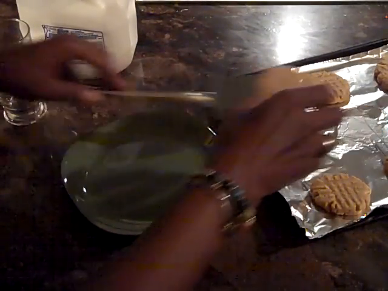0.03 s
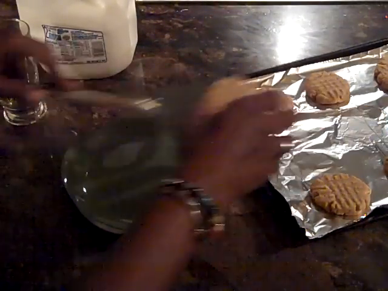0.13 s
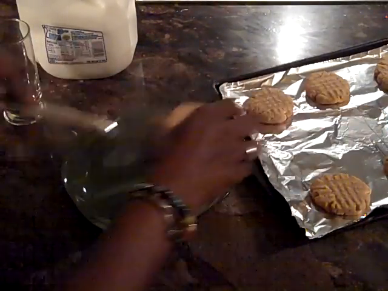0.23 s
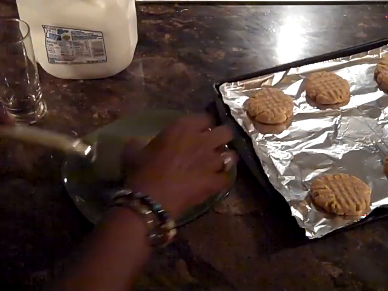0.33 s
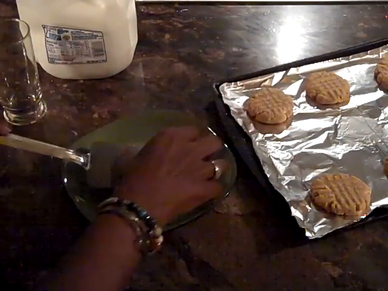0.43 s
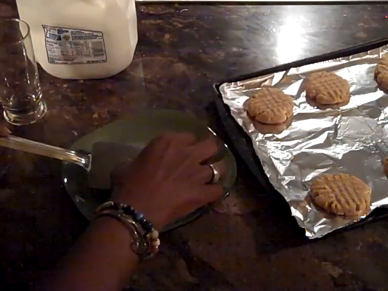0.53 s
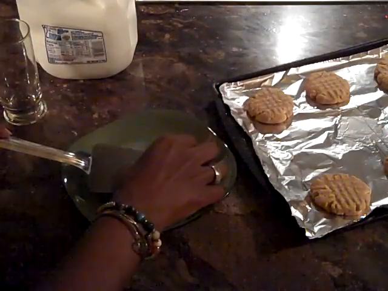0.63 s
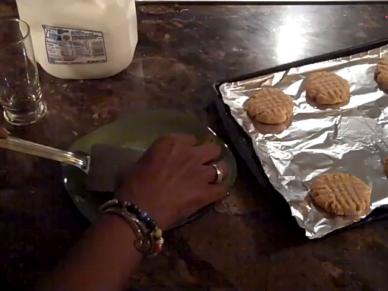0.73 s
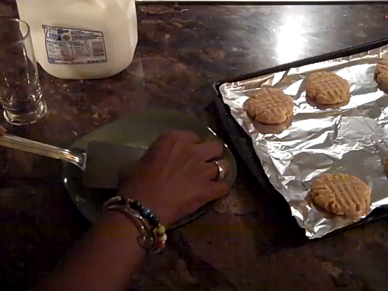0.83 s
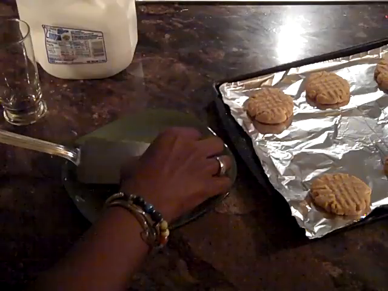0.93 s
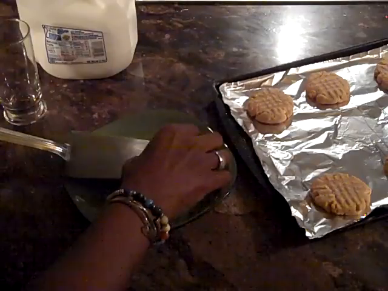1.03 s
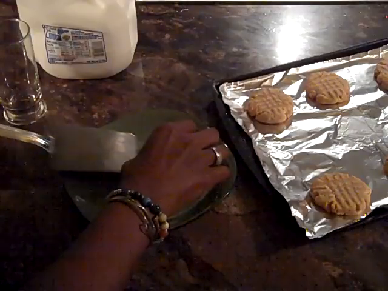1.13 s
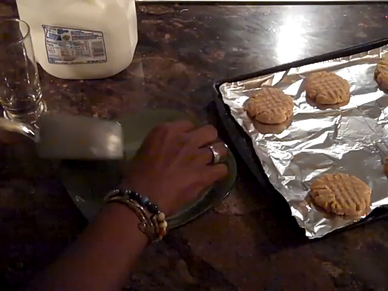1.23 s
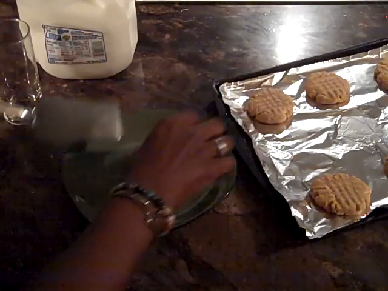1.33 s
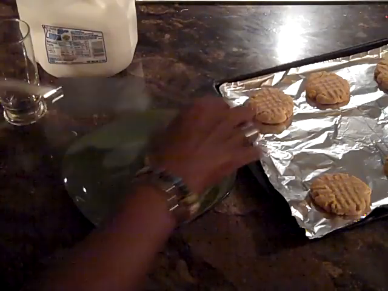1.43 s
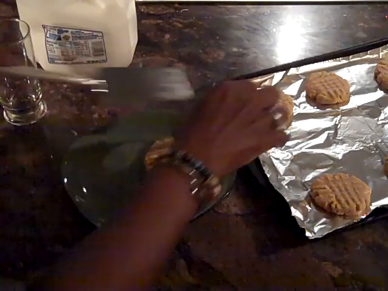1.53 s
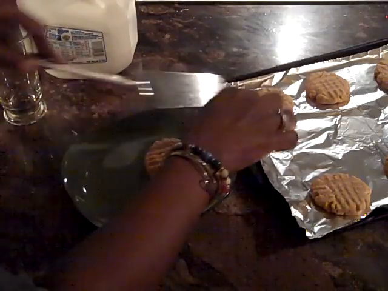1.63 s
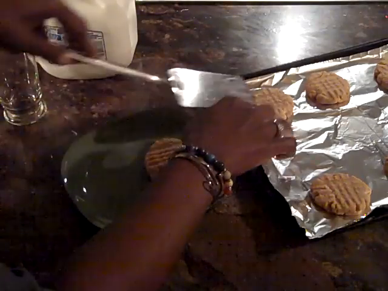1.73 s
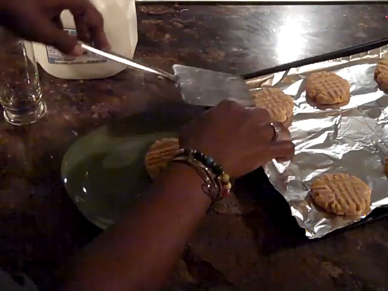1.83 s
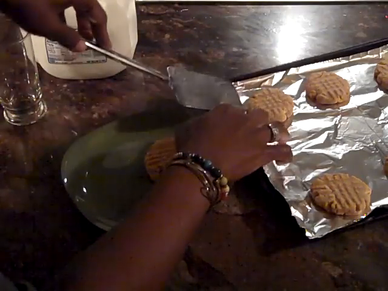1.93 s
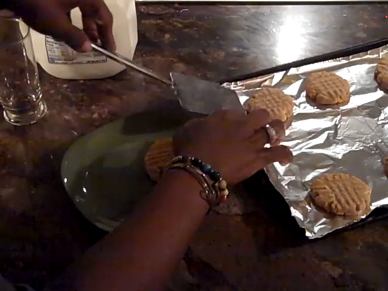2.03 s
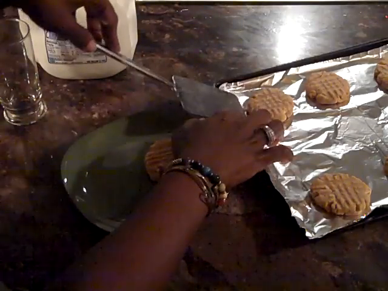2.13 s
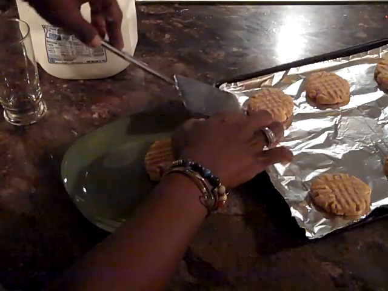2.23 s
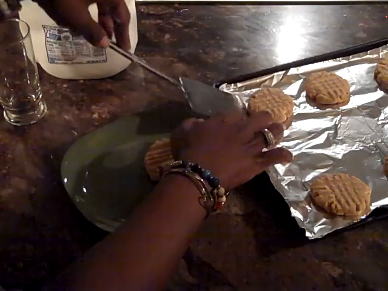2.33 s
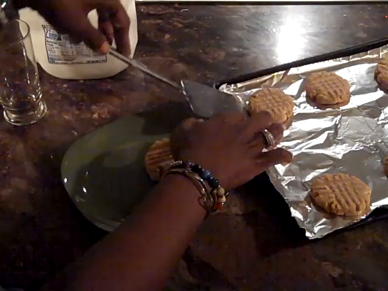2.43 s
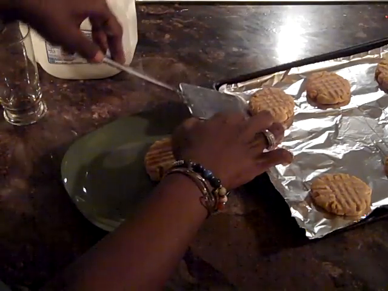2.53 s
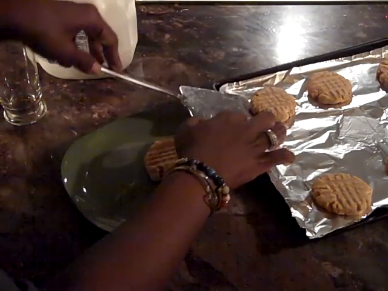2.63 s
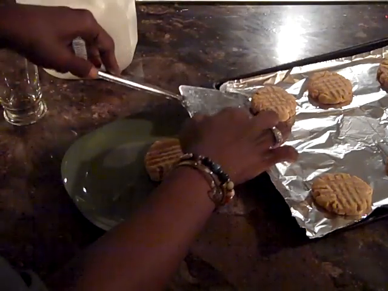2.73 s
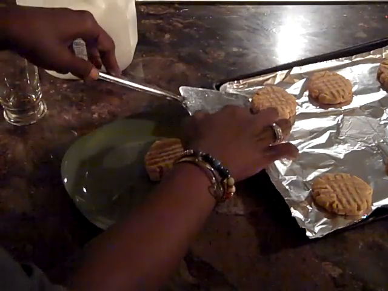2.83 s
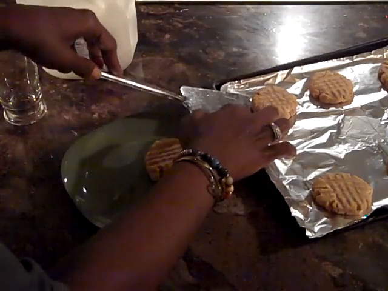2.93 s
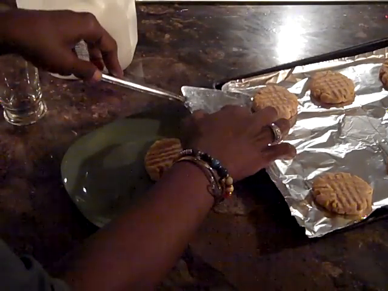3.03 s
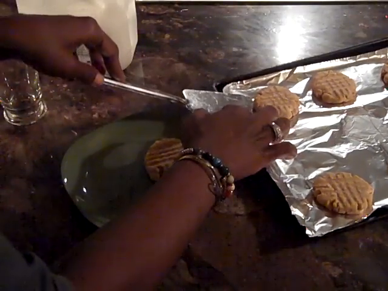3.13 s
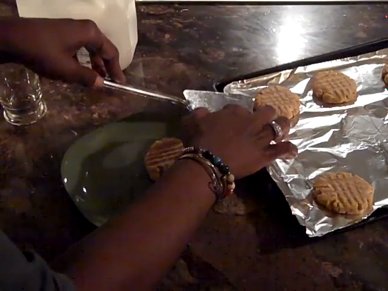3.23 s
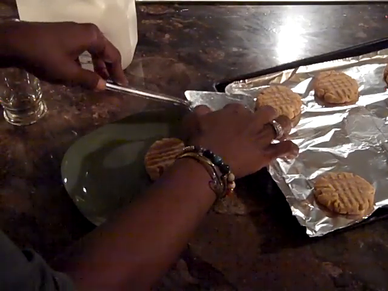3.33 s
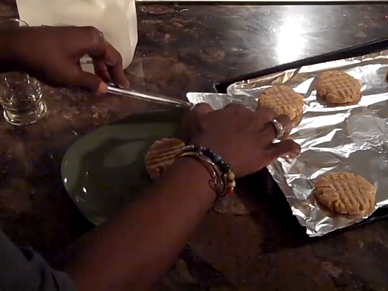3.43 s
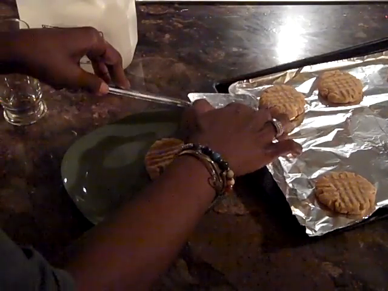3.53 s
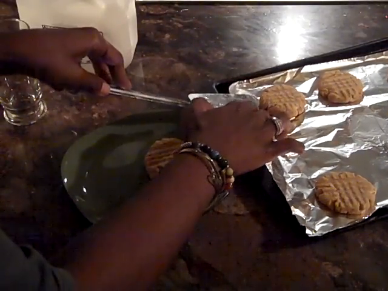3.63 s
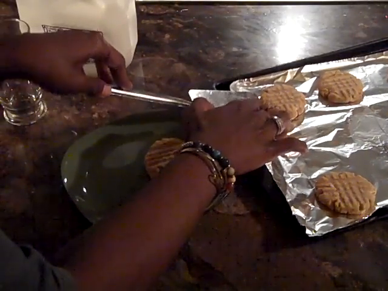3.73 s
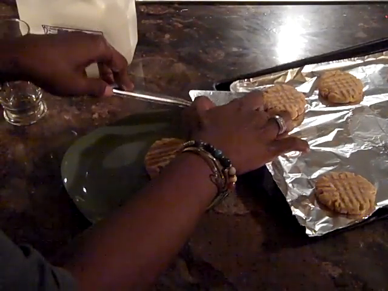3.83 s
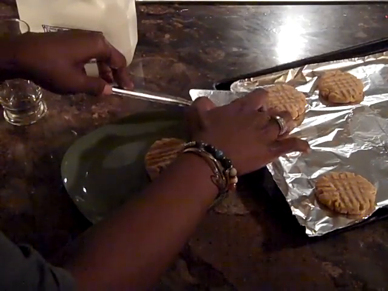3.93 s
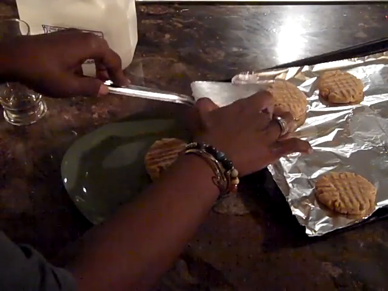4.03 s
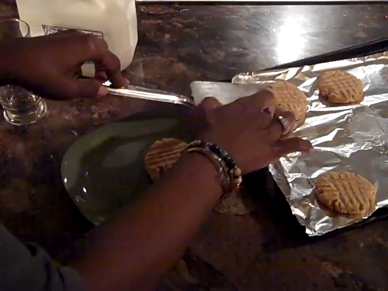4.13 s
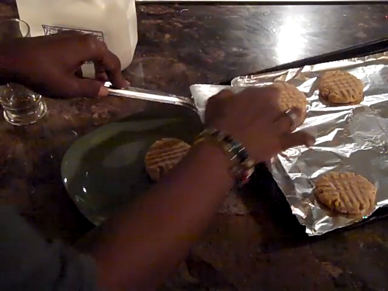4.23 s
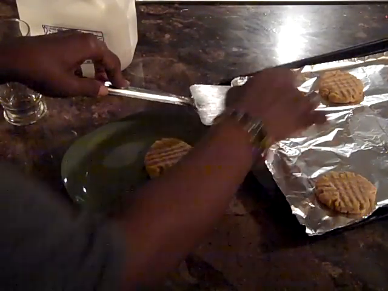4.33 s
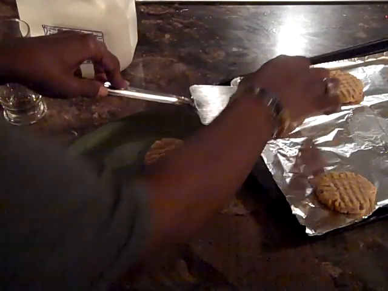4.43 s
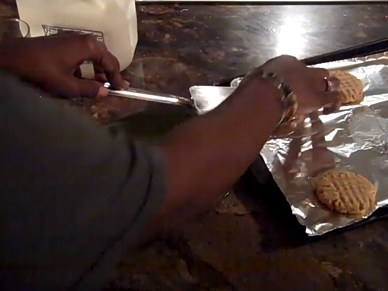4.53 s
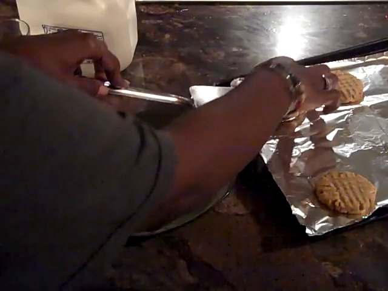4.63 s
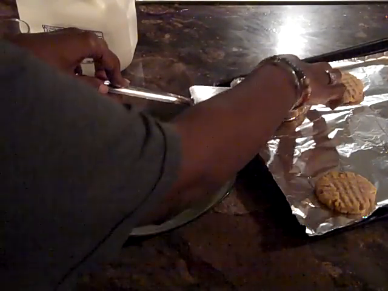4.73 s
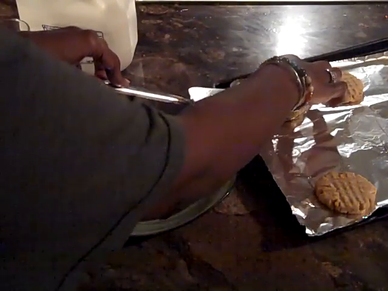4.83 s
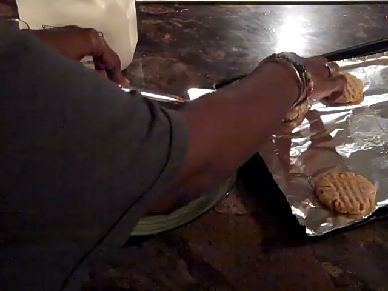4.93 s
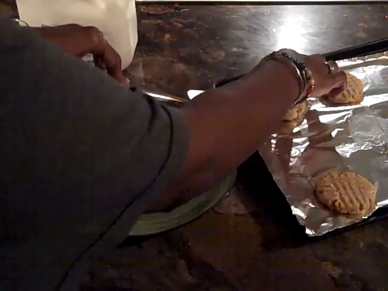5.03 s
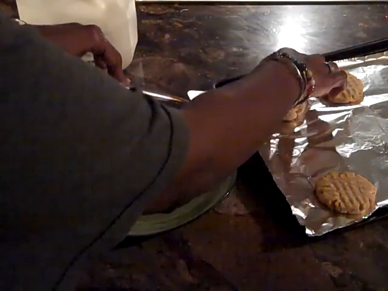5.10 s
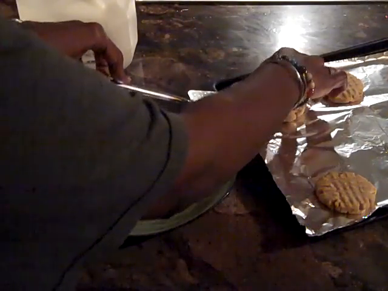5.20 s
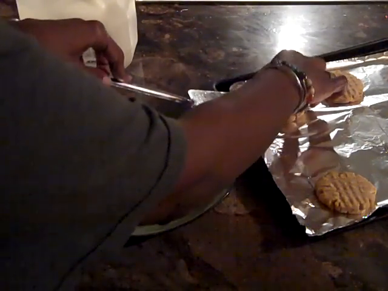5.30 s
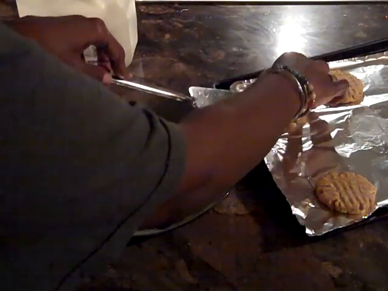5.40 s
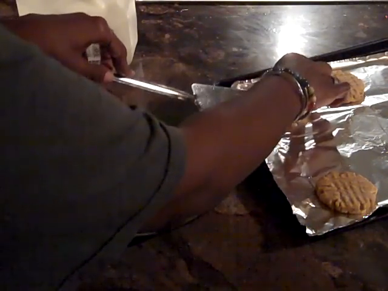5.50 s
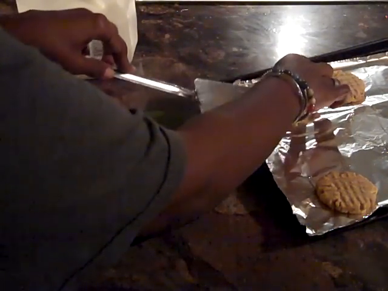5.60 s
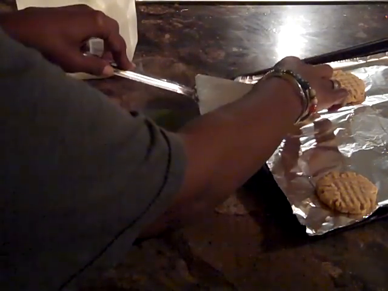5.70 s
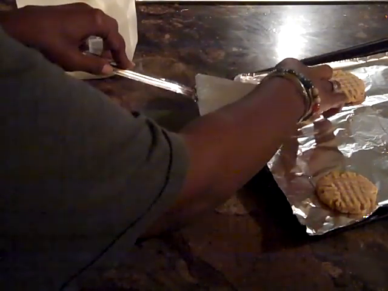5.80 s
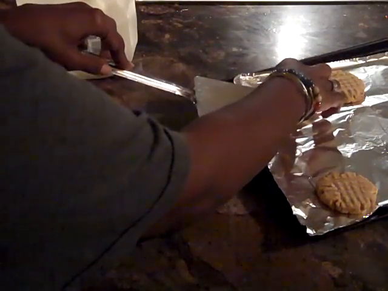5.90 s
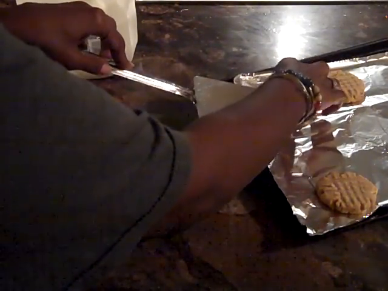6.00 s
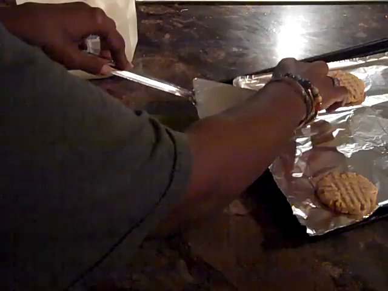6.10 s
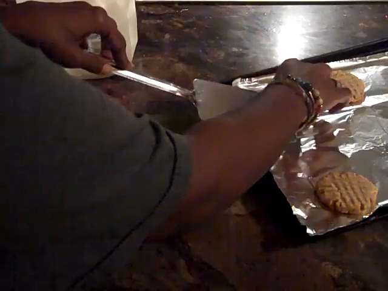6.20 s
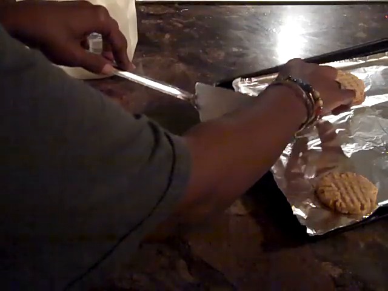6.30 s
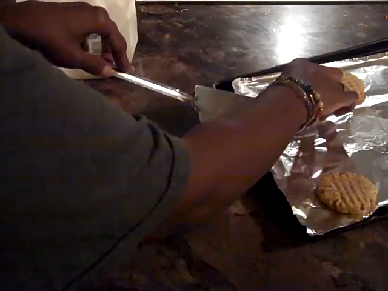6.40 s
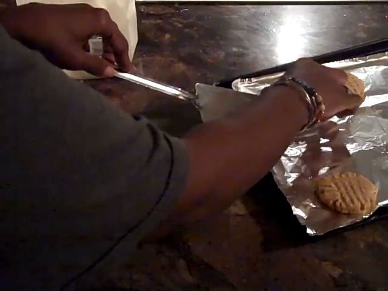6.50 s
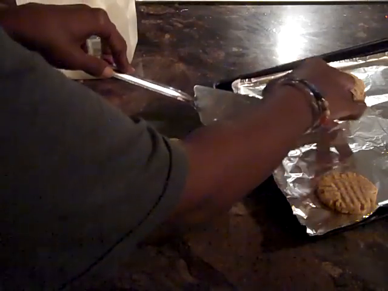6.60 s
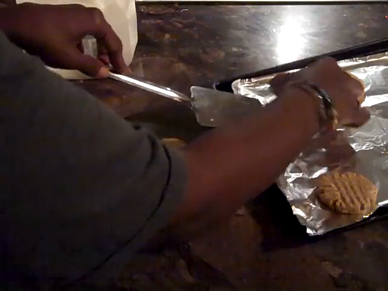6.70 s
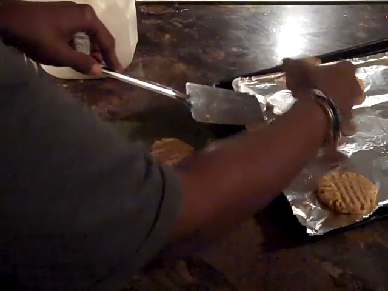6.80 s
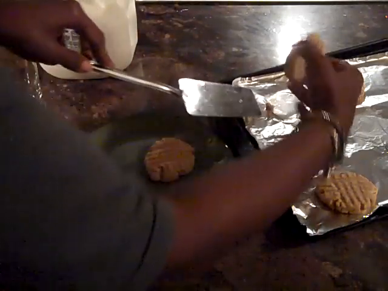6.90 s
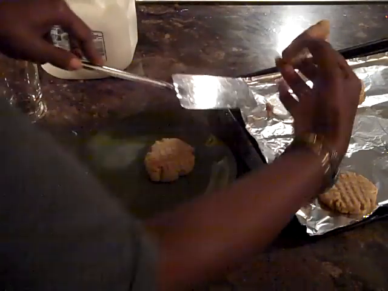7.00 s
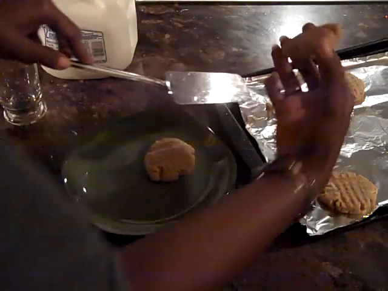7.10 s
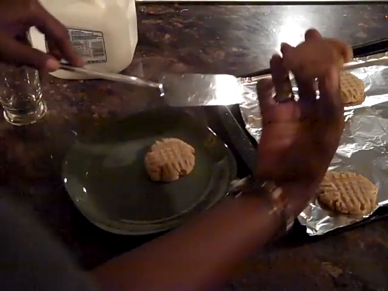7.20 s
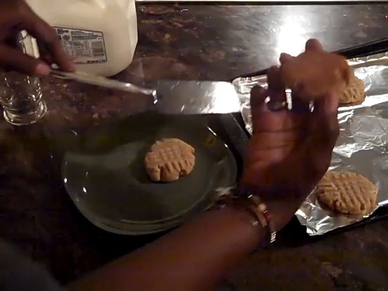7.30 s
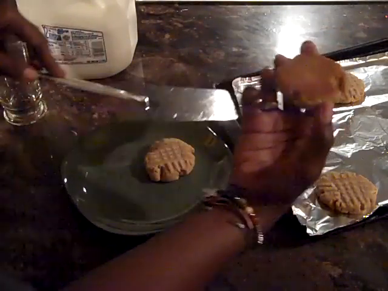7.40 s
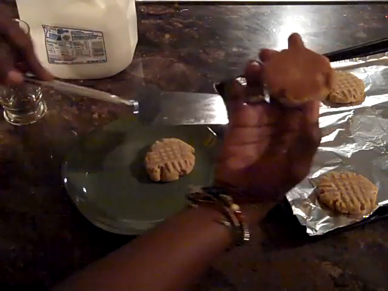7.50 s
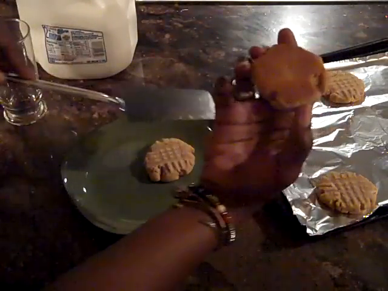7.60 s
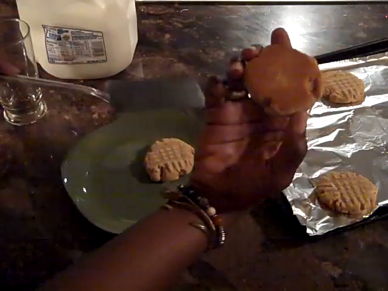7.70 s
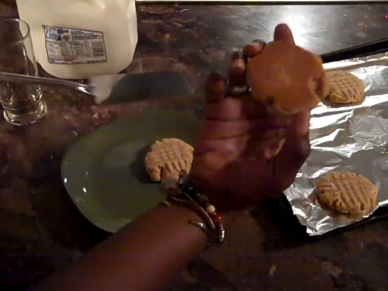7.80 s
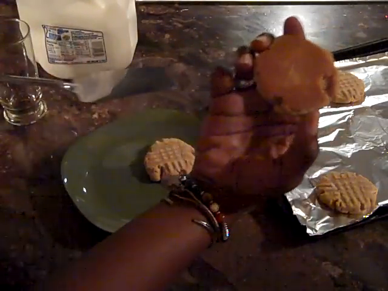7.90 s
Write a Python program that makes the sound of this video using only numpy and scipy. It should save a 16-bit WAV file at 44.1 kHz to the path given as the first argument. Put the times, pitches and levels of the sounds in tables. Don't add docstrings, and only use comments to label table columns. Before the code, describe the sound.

A small, close stereo camera with shrill upper treble hears a quiet kitchen, low fridge hum and soft room tone throughout. At 0.5 s a steel spatula clinks brightly on a stoneware plate, with a short ring; a much lighter touch follows at 0.7 s. Near silence and tiny foil ticks last until about 1.9 s. Then the blade slides under cookies on a foil-lined sheet: rustling, dull metal knocks, and a very loud abrupt crack at 2.4 s. Dense crisp creases and sharp snaps continue to 4.1 s, with a strong metallic ring near 3.8 s. From 4.6 to 6.7 s, sparser crackles and pops accompany prising, with a last rustle around 6.4 s. Outside, faint tyre roar and whine swell around 5 to 6.5 s, bass trailing slightly. Isolated ticks remain near 7.05 and 7.9 s, as the distant roar gently rises again.

```python
import sys
import numpy as np
from scipy import signal
from scipy.fft import rfft, irfft, next_fast_len
from scipy.io import wavfile
from scipy.ndimage import uniform_filter1d, map_coordinates

SR = 44100
rng = np.random.default_rng(int(sys.argv[2]) if len(sys.argv) > 2 else 0)


def convert_level_to_amplitude(level_db):
    exponent = np.asarray(level_db, float) / 20
    return 10 ** exponent


def bounce(signal):
    frames = np.transpose(np.atleast_2d(signal))
    limited = np.clip(frames, -1, 1)
    pcm = np.round(limited * 32767).astype(np.int16)
    wavfile.write(sys.argv[1], SR, pcm)


N = 350595


def unit(x):
    return x / np.sqrt(np.mean(x ** 2) + 1e-20)


def along(points, hz):
    f, v = np.transpose(points)
    return np.interp(np.log(hz + 1), np.log(f + 1), v)


def curve(rows):
    s, value = np.transpose(rows)
    return np.interp(np.arange(N) / SR, s, value)


def wobble(rate):
    knots = rng.standard_normal(int(N * rate / SR) + 4)
    return map_coordinates(knots, [np.arange(N) * rate / SR])


def swell(middle, half):
    return np.exp(-((np.arange(N) / SR - middle) / half) ** 2)


def filtered(x, response):
    m = next_fast_len(N + 8192)
    return irfft(rfft(x, m) * response(np.fft.rfftfreq(m, 1 / SR)), m)[..., :N]


def lift(f, hz, width, db):
    return 1 + convert_level_to_amplitude(db) * 1j * f * width / (hz * hz - f * f + 1j * f * width)


def rush(spectrum, alike, patchy_db=0., smooth=(3, 5)):
    pair = rng.standard_normal((2, N))
    if patchy_db:
        z = signal.stft(pair, nperseg=512)[2]
        field = uniform_filter1d(rng.standard_normal(z.shape[1:]), smooth[0], 0)
        field = uniform_filter1d(field, smooth[1], 1)
        pair = signal.istft(z * convert_level_to_amplitude(patchy_db * unit(field)), nperseg=512)[1][:, :N]

    def spread(hz):
        turn = np.arccos(np.clip(along(alike, hz), -1, 1)) / 2
        return convert_level_to_amplitude(along(spectrum, hz)) * [np.cos(turn), np.sin(turn)]

    mid, side = filtered(pair, spread)
    return unit(np.array([mid + side, mid - side]))


def crackle(per_s, spread_db, t60):
    sizes = convert_level_to_amplitude(2 * spread_db * np.clip(rng.standard_normal(N), -2, 2))
    kicks = (rng.random(N) < per_s / SR) * sizes
    keep = convert_level_to_amplitude(-120 / (t60 * SR))
    return unit(np.sqrt(np.abs(signal.lfilter([1], [1, -keep], kicks))))


def rings(rows, rough, flutter_db=0.):
    out, lean = np.zeros((2, N + SR)), np.array([[1], [-1]])
    for s, hz, db, t60 in rows:
        side, turn = rng.standard_normal(2)
        t = np.arange(int(np.clip(t60, .01, .5) * SR)) / SR
        drift = np.cumsum(rng.standard_normal(SR // 2))[:len(t)]
        waver = rough * drift * np.sqrt(hz / 5000 / SR)
        flutter = np.interp(t, np.arange(30) / 50, rng.standard_normal(30))
        flutter = flutter_db * flutter * np.clip(t / .03, 0, 1)
        phase = 2 * np.pi * hz * t + waver + lean * turn * hz / 30000
        level = convert_level_to_amplitude(db + flutter + side * lean - 60 * t / t60) * (1 - np.exp(-t / 0.00024))
        start = round(s * SR)
        out[:, start:start + len(t)] += level * np.sin(phase)
    return out[:, :N]


# start in seconds, peak in dB, sheet knock in dB, sharpness in dB,
# dying time in seconds.
SNAPS = [(2.1586, -32.5, -10, -21, 0.11), (2.3893, -20, -4.5, -15, 0.024), (2.4078, -24, -16, -19, 0.033),
         (2.432, 10.5, -22, -30, 0.022), (2.6464, -26.5, -7.5, -26, 0.049), (2.829, -22, -3, -8, 0.035),
         (2.885, -27.5, -20, 2, 0.066), (2.992, -28.5, 2, -32, 0.036), (3.1002, -22, -10, -32, 0.036),
         (3.3797, -19.5, -30, -2, 0.074), (3.7632, -8.5, -42.5, -5, 0.05),
         (3.8182, -17.5, -3.5, -23, 0.088), (3.9094, -20.5, -34, -7.5, 0.079),
         (3.9535, -21, -35, -4.5, 0.05), (3.9862, -15.5, -38, -6, 0.048), (4.0598, -24.5, -13, -6, 0.09),
         (4.1082, -19, -20, -11.5, 0.13), (4.6348, -22, -9.5, -11, 0.11), (5.1055, -20, -30, -8, 0.066),
         (5.6826, -23, -32, -2.5, 0.081), (6.2275, -29.5, -35, 1.5, 0.069), (6.2922, -19.5, -14, -6, 0.064),
         (6.3602, -25.5, -10, -9, 0.089), (6.4963, -18, -38, -7, 0.049)]
# start in seconds,
# peak in dB, sharpness in dB, dying time in seconds.
BUCKLES = [(1.9545, -60, -16, 0.07), (1.9759, -53, -18, 0.07), (1.9824, -49, -18, 0.07),
           (1.9914, -41, -20, 0.07), (2.4934, -32, -18, 0.055), (2.5471, -39, -18, 0.07),
           (2.5624, -36, -15, 0.064), (2.6833, -37, -4, 0.07), (2.7018, -32.5, -18, 0.07),
           (2.7255, -25.5, -23, 0.054), (2.7636, -32, -14, 0.081), (2.7788, -36, -18, 0.082),
           (2.8433, -26, -18, 0.08), (2.907, -31, -18, 0.07), (3.079, -31.5, -20, 0.07),
           (3.171, -37, -18, 0.07), (3.1772, -32.5, 3, 0.08), (3.2031, -31, -18, 0.07),
           (3.2176, -25.5, -16, 0.07), (3.2394, -27, -18, 0.076), (3.3593, -29.5, -18, 0.06),
           (3.4421, -31, -6, 0.077), (3.571, -32, -13, 0.085), (3.6255, -38, -18, .04),
           (3.6521, -32.5, -18, 0.07), (3.6711, -39.5, -17, 0.07), (3.697, -44.5, -13, 0.07),
           (3.7254, -42, -21.5, 0.042), (3.8814, -38, -18, 0.063), (4.0402, -31, -16, 0.048),
           (4.2, -28.5, -22, 0.053), (4.3304, -43, -9, 0.14), (4.4104, -45.5, -18, 0.058),
           (4.4982, -49, -18, 0.064), (4.5072, -47, -20, 0.07), (4.5837, -46, -18, 0.064),
           (4.796, -35, -20, 0.055), (4.962, -30.5, -24, 0.097), (4.9984, -48, -18, 0.07),
           (5.0374, -44, -18, 0.05), (5.0619, -32, -18, 0.037), (5.1274, -25, -18, 0.075),
           (5.237, -27, -21, 0.066), (5.243, -27.5, -18, 0.055), (5.418, -33.5, -18, 0.07),
           (5.457, -31.5, -13, 0.13), (5.5134, -39, -18, 0.076), (5.5414, -26, -15, 0.095),
           (5.5997, -36, -18, 0.051), (5.661, -34.5, -20, 0.054), (5.7488, -34.5, -24, 0.12),
           (5.804, -30.5, -24, 0.066), (5.876, -42.5, -22, 0.19), (6.007, -35.5, -1, 0.056),
           (6.0372, -43, -18, 0.06), (6.093, -28, -23, 0.1), (6.1719, -42, -15, 0.07),
           (6.2713, -32.5, -14, 0.098), (6.4134, -28, -18, 0.061), (6.4527, -30, -20, 0.07),
           (6.633, -32, -20, 0.061)]
# start in seconds, peak in dB, sharpness in dB, dying
# time in seconds.
SLIPS = [(2.3767, -36.5, -22.5, 0.14), (2.7195, -32, -20, .05), (3.3673, -30, -12, .06),
         (3.7448, -34, -20.5, .06), (4.0844, -33, -18.5, .06), (4.633, -24, -15, 0.062),
         (5.083, -40, -18, 0.047), (5.6742, -35, -18, 0.055), (6.0812, -55, -18, .05),
         (6.2146, -52, -22, .06), (6.3548, -32, -18, .05)]
# start in seconds, peak in dB, sheet knock in dB,
# dying time in seconds.
BUMPS = [(2.176, -34, 2.5, 0.098), (2.347, -39, -1.5, 0.23), (3.1435, -34, -5, 0.14),
         (3.263, -27.5, -0.5, 0.054), (3.3, -24.5, -7, 0.065), (3.517, -43, 8, 0.11),
         (3.5243, -33.5, 6, 0.11), (3.6127, -39, -3.5, 0.082), (3.6382, -34.5, 2, 0.05),
         (4.2822, -39.5, -0.5, 0.058), (4.309, -39.5, 1.5, 0.096), (4.881, -41.5, -4, 0.047),
         (5.155, -29.5, -5.5, 0.095), (5.299, -34, -11, 0.051), (5.3752, -45, -1, 0.07),
         (5.5324, -33, -0.5, 0.13), (5.93, -39, -0.5, 0.12), (6.556, -28, -7.5, 0.092),
         (6.6917, -37.5, -11, 0.16)]
# start in seconds, peak in dB, sharpness in dB.
TICKS = [(0.022, -57, -25), (0.297, -60, -20), (0.111, -46, -2), (1.2662, -62.5, -11), (1.4617, -52, -20),
         (1.4854, -43.5, -6), (1.6039, -57, -15), (1.6164, -52, -20), (1.6288, -42, -8),
         (1.8583, -57.5, -12), (7.031, -40, -3), (7.0529, -40.5, 3.5), (7.902, -43.5, -29)]


def creases():
    small = BUCKLES + SLIPS
    buckles = [(s, db, -16, sharp_db, t60) for s, db, sharp_db, t60 in small]
    bumps = [(s, db, knock_db, -10.5, t60) for s, db, knock_db, t60 in BUMPS]
    ticks = [(s, db, -28, sharp_db, .017) for s, db, sharp_db in TICKS]
    return SNAPS + buckles + bumps + ticks


def crease_power():
    click, tail = np.zeros((2, 3, N + SR))
    t = np.arange(SR // 6) / SR
    for s, db, knock_db, sharp_db, t60 in creases():
        life = np.clip(t60, .01, .16) * np.array([[1], [.8], [.8]])
        rise = 0.00039 + 0.0062 * convert_level_to_amplitude(db)
        size = convert_level_to_amplitude(db + np.array([[0], [knock_db], [sharp_db]])) * (1 - np.exp(-t / rise))
        span = slice(round(s * SR), round(s * SR) + len(t))
        click[:, span] += (size * convert_level_to_amplitude(1.0 - 60 * t / 0.0038)) ** 2
        tail[:, span] += (size * convert_level_to_amplitude(-6 - 60 * t / life)) ** 2
    return click[:, :N] + tail[:, :N] * crackle(per_s=2600, spread_db=1.8, t60=.008) ** 2


# time in seconds, rustle in dB.
DRAG = [(1.93, -77), (2.03, -61), (2.26, -61.5), (2.47, -50), (2.7, -59.5), (2.96, -63), (3.24, -54),
        (3.7, -55), (3.97, -54), (4.08, -56), (4.47, -67), (4.92, -68), (5.13, -62.5), (5.55, -57.5),
        (6.1, -66), (6.4, -50), (6.55, -54), (6.95, -75)]
# middle in seconds, level in dB, half length in seconds, sheet share in dB.
SLIDES = [(2.024, -44.5, 0.024, -7), (2.071, -43.5, 0.016, -12), (2.118, -50.5, 0.016, -18),
          (2.19, -50.5, 0.032, -0.5), (2.43, -30, 0.013, -7), (2.437, -21, 0.0034, -12.5),
          (3.7685, -28.5, 0.0012, -29.5), (3.035, -45.5, 0.024, -15), (3.231, -39, 0.018, -8),
          (3.414, -37.5, 0.012, -12.5), (4.121, -37, 0.013, -0.5), (6.32, -51, 0.044, -1),
          (6.401, -35.5, 0.016, -4.5), (6.46, -55, 0.022, -3), (6.713, -47.5, 0.022, -1.5),
          (6.806, -57, 0.024, -3)]


def drag_power():
    first, last = DRAG[0][0], DRAG[-1][0]
    moving = np.interp(np.arange(N) / SR, [first, first + 0.044, last - .08, last], [0, 1, 1, 0])
    shares = convert_level_to_amplitude(2 * np.array([[0], [-1], [-8]]))
    power = (moving * convert_level_to_amplitude(curve(DRAG) + 1.1 * wobble(49))) ** 2 * shares
    for s, db, half, sheet_db in SLIDES:
        power += convert_level_to_amplitude(2 * (db + np.array([[0], [sheet_db], [-16]]))) * swell(s, half)
    return power * crackle(per_s=230, spread_db=-3.5, t60=0.15) ** 2


# frequency in Hz, level in dB per Hz.
FOIL = [(1500, -26), (3000, -13), (4500, -6), (6000, -3), (8000, -0.5), (9500, -10), (11000, -14.5),
        (14000, -21)]
# frequency in Hz, level in dB per Hz.
SHEET = [(300, -37.5), (700, -21), (1100, -19), (1600, -10), (2400, -9), (3300, -13), (5000, -10.5),
         (9000, -50)]
# frequency in Hz, level in dB per Hz.
EDGE = [(6000, -16), (9500, 16.5), (11000, 4.5), (13000, 7), (14300, 4), (17000, -33)]
# frequency in Hz, likeness from 0 to 1.
NEAR_ALIKE = [(300, 1), (1400, 1), (3100, 0.97), (6800, 0.9), (14000, 0.9)]


def foil():
    layers = zip(crease_power() + drag_power(), (FOIL, SHEET, EDGE))
    return sum(np.sqrt(power) * rush(colour, NEAR_ALIKE, patchy_db=2.5) for power, colour in layers)


# start in seconds, peak in dB, pitch in Hz.
PANELS = [(2.1618, -38, 4310), (2.1793, -37, 4610), (2.3873, -32, 5200), (2.4078, -27.5, 3500),
          (2.4342, -19.5, 5160), (2.6457, -29, 4620), (2.8283, -33, 5510), (2.8842, -34, 5230),
          (2.992, -33, 3620), (3.1431, -34, 4130), (3.2174, -38, 5630), (3.2978, -41, 4600),
          (3.3591, -42.5, 4740), (3.3801, -36, 5500), (3.5238, -32.5, 3640), (3.7443, -32, 4020),
          (3.7647, -26.5, 4130), (3.8006, -25, 5050), (3.8186, -21, 3584), (3.9139, -29, 5150),
          (3.9548, -36, 5360), (3.9857, -28, 4240), (4.06, -37, 5220), (4.1089, -21, 3980),
          (4.282, -40, 4580), (4.6357, -30, 5440), (4.96, -36, 5410), (5.1057, -26, 5100),
          (5.2409, -33, 5500), (5.4569, -43, 5000), (5.5397, -33, 4800), (5.6614, -38, 5430),
          (5.6828, -42, 5340), (5.8046, -39, 4860), (5.9303, -39, 4470), (6.0071, -53, 5420),
          (6.0944, -32.5, 4540), (6.2146, -41.5, 5380), (6.2735, -35, 4040), (6.292, -27, 5450),
          (6.3613, -28, 5480), (6.4965, -39, 5270), (6.5574, -38, 5200), (6.6337, -43, 4880)]
# start in seconds, peak in dB, pitch in Hz.
DINGS = [(2.1623, -44.5, 1520), (2.1798, -39, 2350), (2.4213, -35, 2450), (2.4911, -39, 2420),
         (2.6454, -51, 2570), (2.8283, -42, 2330), (2.884, -47, 2330), (2.993, -31.5, 1660),
         (3.0977, -37, 1470), (3.2579, -40, 2360), (3.3018, -39, 2200), (3.3586, -43, 2180),
         (3.5178, -48, 1890), (3.5227, -38, 1490), (3.6375, -39, 2120), (3.7642, -49, 2590),
         (3.8045, -29, 2455), (3.8188, -27, 1400), (4.06, -43, 1590), (4.082, -36, 2590),
         (4.1144, -39, 2410), (4.6392, -40, 1640), (5.152, -40, 1500), (5.5363, -45, 1990)]


def panels():
    patches = [(s, hz, db - 10, .039) for s, db, hz in PANELS]
    dings = [(s, hz, db - 6.5, .04) for s, db, hz in DINGS]
    return rings(patches + dings, rough=26)


# start in seconds, level in dB.
SPIKES = [(2.83, -25.5), (2.8848, -19), (2.992, -40), (2.6457, -52), (3.1005, -46), (3.3597, -36),
          (3.3673, -52), (4.0605, -50), (4.9628, -52), (5.106, -48), (5.6831, -46), (5.749, -56),
          (5.8044, -54), (3.7632, -42), (3.8186, -49), (3.9867, -46), (4.331, -45), (4.6345, -54),
          (4.882, -58), (5.0618, -54), (5.4183, -48), (6.0075, -42), (6.228, -32), (6.2923, -40),
          (6.4968, -48), (7.0523, -58)]


def needles():
    spikes, t = np.zeros(N), np.arange(SR // 100) / SR
    for s, db in SPIKES:
        spikes[round(s * SR):][:len(t)] += convert_level_to_amplitude(db - 60 * t / .00081) * rng.standard_normal(len(t))
    return np.array([spikes, spikes])


# start in seconds, pitch in Hz, level in dB, t60 in seconds.
BLADE = [(2.185, 6360, -55, 0.47), (2.185, 4470, -52, 0.25), (2.18, 1820, -46.5, 0.047),
         (2.18, 933, -47, 0.066), (2.993, 2230, -59, 0.052), (3.525, 1340, -52, 0.073),
         (3.525, 1460, -53, 0.073), (3.525, 2146, -54, 0.13), (3.525, 3684, -43.5, 0.073),
         (3.802, 1900, -47, 0.019), (3.835, 1380, -40, 0.05), (3.819, 1496, -38, 0.06),
         (3.819, 3434, -44, 0.19), (3.819, 3640, -37, 0.13), (3.819, 6250, -44, 0.098),
         (3.819, 6480, -32, 0.1), (3.819, 6450, -56, .25), (4.21, 3010, -59, 0.21),
         (4.962, 3800, -50, 0.055), (5.46, 3800, -50.5, 0.11), (5.038, 3300, -52, .015),
         (2.47, 1490, -48, .02), (2.491, 1390, -47, .02), (6.385, 995, -50, 0.3), (6.39, 2380, -50, 0.13),
         (6.725, 1105, -39.5, 0.044), (6.5, 160.5, -54, 1)]


def blade():
    return rings(BLADE, rough=8.3, flutter_db=1.5)


CLINKS = [
    .4705,
    .7233,
]
PLATE_HZ = [810, 2143, 2202, 2250, 3538, 3617, 3715, 4696, 5336, 5678, 6064, 6163, 6278, 7718, 7806, 8390,
            7552, 9951, 11070, 13580, 2455, 3391, 5110, 4250, 6620, 8700]
# first touch in dB, second touch in dB, t60 in seconds.
PLATE = [(-35.5, -45.5, 0.025), (-56, -60, .08), (-46.5, -55, .22), (-33.5, -57, 0.06), (-45, -70, 0.2),
         (-44.5, -70, 0.34), (-38.5, -57, 0.13), (-36, -64, 0.096), (-32, -62, .065), (-45.5, -64, 0.125),
         (-29, -52, 0.055), (-44, -62, 0.42), (-59, -77, 0.45), (-43, -80, 0.17), (-40, -72, 0.25),
         (-24, -53, 0.076), (-45, -70, 0.094), (-44, -87, 0.23), (-48.5, -85, 0.13), (-45, -85, 0.17),
         (-51, -67, .2), (-49.5, -66, 0.16), (-48, -70, .1), (-51, -72, .1), (-48, -68, 0.088),
         (-48, -68, .12)]


def plate():
    hits = []
    for k, s in enumerate(CLINKS):
        hits += [(s, hz, levels[k], t60) for hz, (*levels, t60) in zip(PLATE_HZ, PLATE)]
    t = np.arange(N) / SR
    touches = zip(CLINKS, (-33, -48.5), (.095, .04))
    crack = sum((t > s) * convert_level_to_amplitude(db - 60 * np.abs(t - s) / t60) for s, db, t60 in touches)
    colour = [(400, -11), (800, -1.5), (3000, -8.5), (5500, 7.5), (7200, -4.0), (14000, -21.5)]
    return rings(hits, rough=5.5, flutter_db=2.8) + crack * rush(colour, NEAR_ALIKE)


# frequency in Hz, t60 in seconds.
ECHO = [(500, 0.36), (1500, 0.34), (3000, 0.39), (12000, 0.065)]
# frequency in Hz, likeness from 0 to 1.
FAR_ALIKE = [(40, 0.85), (130, 0.52), (290, 0.98), (640, 0.89), (1410, 0.64), (3100, 0.031), (15000, 0)]


def echo(x):
    hz, t, z = signal.stft(rng.standard_normal((2, SR // 2)), SR, nperseg=256)
    turn = np.arccos(np.clip(along(FAR_ALIKE, hz), -1, 1))[:, None] / 2
    z = np.cos(turn) * z[0] + np.sin(turn) * z[1] * np.array([1, -1])[:, None, None]
    tail = signal.istft(z * convert_level_to_amplitude(-60 * t / along(ECHO, hz)[:, None]), SR, nperseg=256)[1]
    late = np.pad(x, ((0, 0), (200, 0)))
    return signal.fftconvolve(late, tail / np.linalg.norm(tail[0]), axes=1)[:, :N]


# pitch in Hz, width in Hz, boost in dB, treble tilt in dB per octave.
PORTS = [
    (7830, 1130, 6, 1.5),
    (6360, 770, 12, -11),
]


def ports(x):
    def response(f):
        octaves = np.log2(1 + (f / 9000) ** 3)
        colour = [lift(f, hz, width, db) * convert_level_to_amplitude(tilt * octaves) for hz, width, db, tilt in PORTS]
        lag_s = np.array([[1.9e-5], [0]])
        return colour * convert_level_to_amplitude(-.012 * np.clip(f - 14800, 0, None)) * np.exp(-2j * np.pi * f * lag_s)
    return filtered(x, response)


# time in seconds, level in dB.
TRAFFIC = [(0, -65), (2.7, -65), (3.7, -62), (4.15, -63.5), (4.6, -61.5), (5.0, -57.5), (5.87, -55.5),
           (6.58, -57), (6.9, -59), (7.35, -60), (7.75, -57.5), (7.95, -57)]
# frequency in Hz, level in dB per Hz.
ROAR = [(120, -3), (220, -3.5), (450, -9.5), (800, -2.5), (1150, -6), (1600, -12.5), (3000, -24),
        (6000, -54)]
# frequency in Hz, level in dB per Hz.
RUMBLE = [(20, -25), (40, -5.5), (75, -3), (110, -7), (200, -41.5)]


def vehicle():
    t, roar_db = np.arange(N) / SR, curve(TRAFFIC)
    above = np.sqrt(np.clip(convert_level_to_amplitude(2 * roar_db) - convert_level_to_amplitude(2 * -67), 0, 1))
    roar = above * convert_level_to_amplitude(4.5 + 0.73 * wobble(6.2)) * rush(ROAR, FAR_ALIKE, patchy_db=1.9, smooth=(2, 30))
    rumble_db = -67 + .84 * (np.interp(t - .4, t, roar_db) - roar_db.mean())
    return roar + convert_level_to_amplitude(rumble_db + 3.5 + 2.8 * wobble(6.0)) * rush(RUMBLE, FAR_ALIKE)


# middle in seconds, half length in seconds, pitch in Hz, width in Hz, level in dB.
WHINE = [
    (5.15, 0.19, 834, 120, -57.5),
    (5.6, 0.53, 740, 100, -61),
    (6.2, 0.33, 1030, 120, -64),
]


def whine():
    out = np.zeros(N)
    for s, half, hz, width, db in WHINE:
        band = filtered(rng.standard_normal(N), lambda f: np.exp(-((f - hz) / width) ** 2))
        out += convert_level_to_amplitude(db) * swell(s, half) * unit(band)
    return out


# pitch in Hz, level in dB.
FRIDGE = [
    (120, -59.5),
    (160, -66.5),
]


def fridge():
    t, hum = np.arange(N) / SR, np.zeros(N)
    for hz, db in FRIDGE:
        hum += convert_level_to_amplitude(db + 1 + 0.253 * wobble(2.1)) * np.sin(2 * np.pi * hz * t + 0.38 * wobble(4))
    return hum


# frequency in Hz, level in dB per Hz.
KITCHEN = [(15, -49.5), (25, -20.5), (91, -31), (122, -6.5), (198, -8.5), (227, -6.5), (340, -8),
           (421, -10.5), (469, -12), (537, -16.5), (1450, -32.5), (7500, -34), (8350, -35), (13900, -45.5),
           (15500, -88)]


def room_tone():
    return convert_level_to_amplitude(-58.5 + 0.34 * wobble(2.18)) * rush(KITCHEN, FAR_ALIKE)


# pitch in Hz, width in Hz, level in dB.
WALLS = [(80.5, 7.7, -5.5), (218, 18.7, -4.5), (300, 18, -2), (435, 44.5, 3.5), (533, 5.4, 5.5),
         (746, 44, -10), (1120, 34, -9.5)]
# frequency in Hz, balance in dB.
FAR_BALANCE = [(60, -6.5), (180, -1), (550, -0.5), (1650, 0), (4970, 2), (15000, 3.5)]


def background():
    def walls(f):
        return convert_level_to_amplitude(-2) * np.prod([lift(f, *wall) for wall in WALLS], axis=0)
    far = fridge() + whine() + filtered(room_tone() + vehicle(), walls)
    return filtered(far, lambda hz: convert_level_to_amplitude(np.array([[.5], [-.5]]) * along(FAR_BALANCE, hz)))


def scene():
    near = convert_level_to_amplitude(-5.5) * foil() + panels() + blade() + plate()
    dull = ports(near + convert_level_to_amplitude(-8.5) * echo(near)) + background()
    return filtered(dull, lambda hz: convert_level_to_amplitude(-.04 * np.clip(hz - 14100, 0, None))) + ports(needles())


def band_limit(x):
    return signal.sosfilt(signal.butter(12, 16510, fs=SR, output="sos"), x)


def record(dry):
    return band_limit(dry)


dry = scene()
out = record(dry)
bounce(out)
```